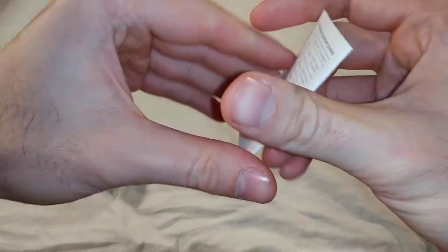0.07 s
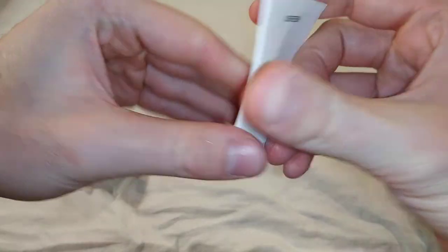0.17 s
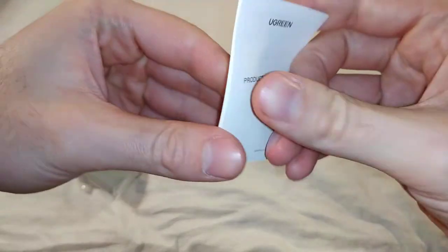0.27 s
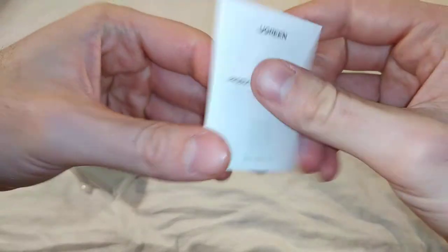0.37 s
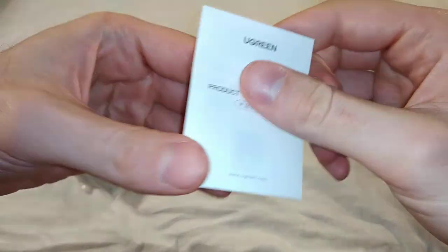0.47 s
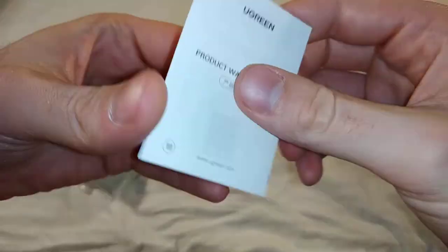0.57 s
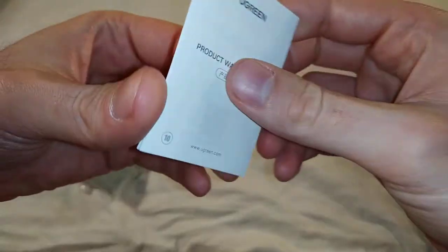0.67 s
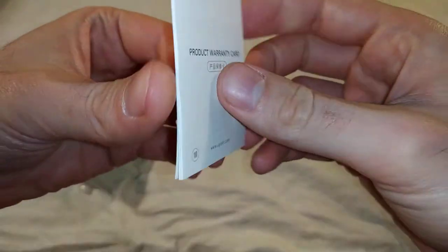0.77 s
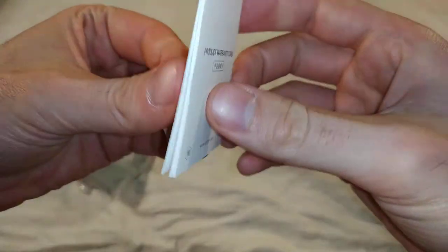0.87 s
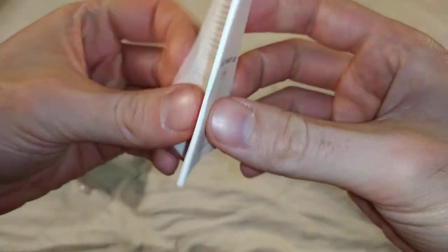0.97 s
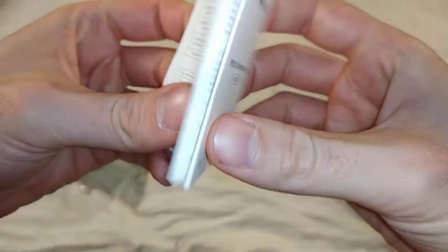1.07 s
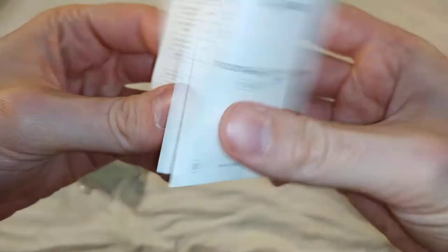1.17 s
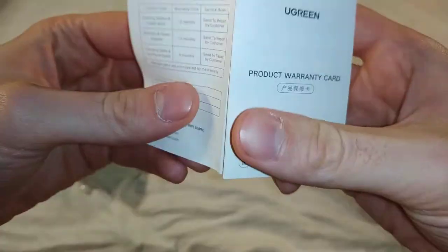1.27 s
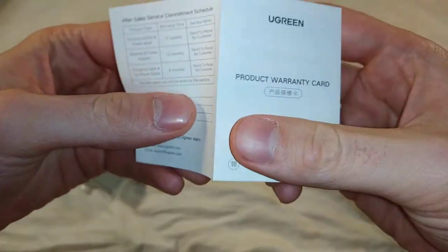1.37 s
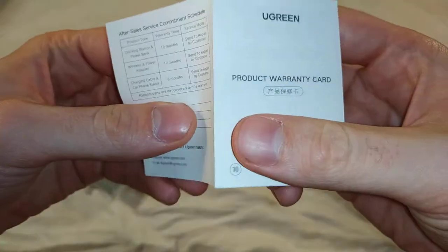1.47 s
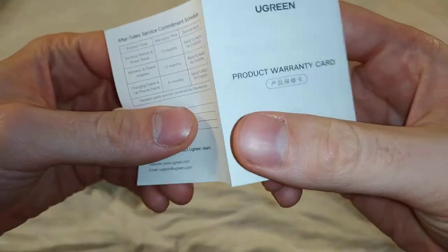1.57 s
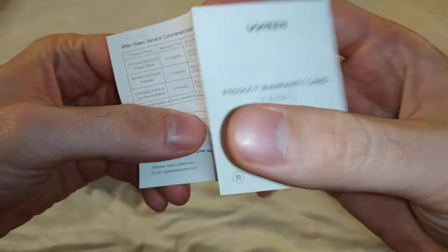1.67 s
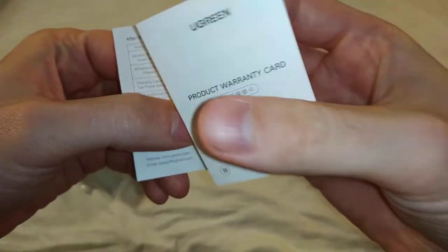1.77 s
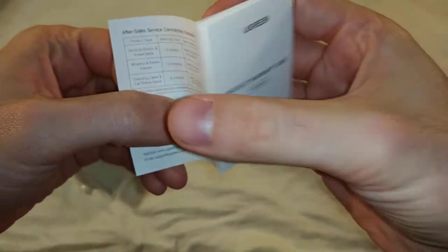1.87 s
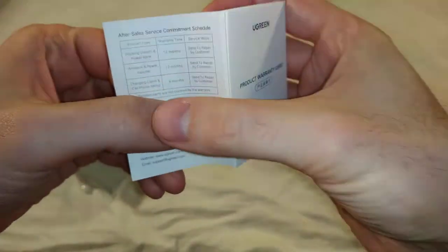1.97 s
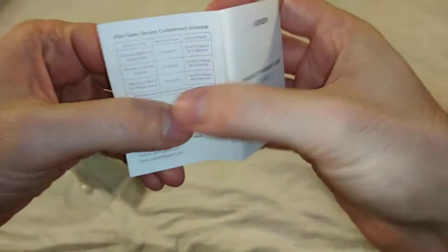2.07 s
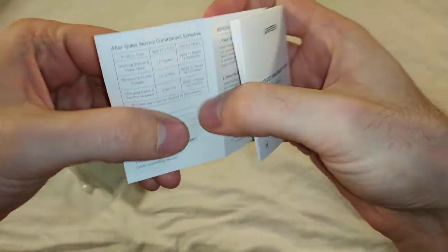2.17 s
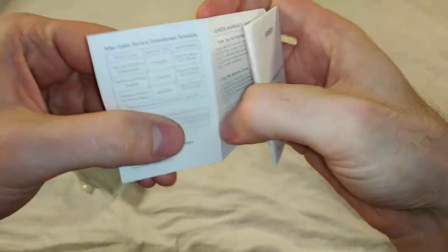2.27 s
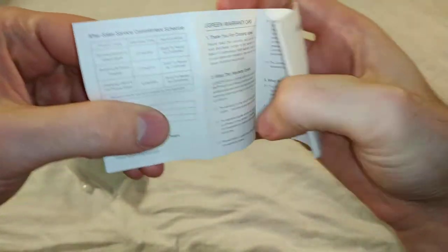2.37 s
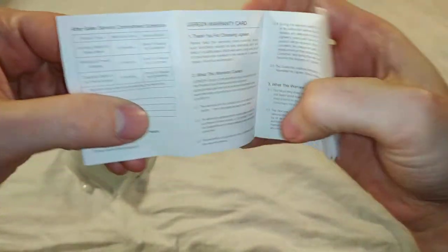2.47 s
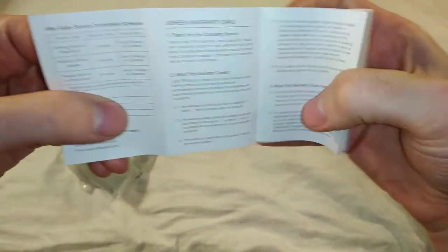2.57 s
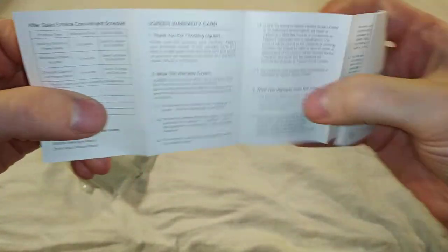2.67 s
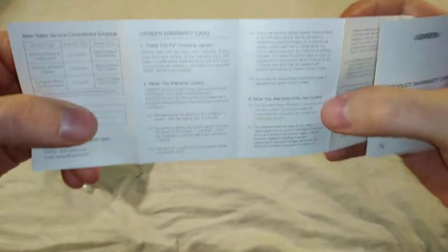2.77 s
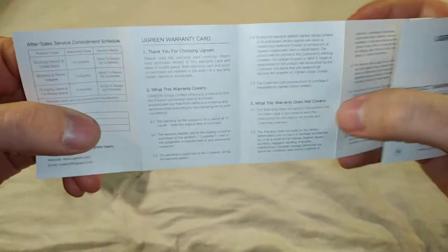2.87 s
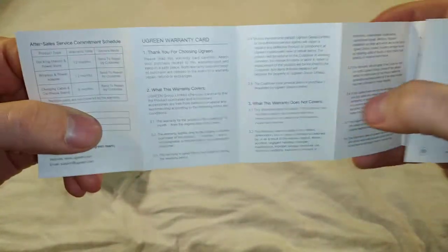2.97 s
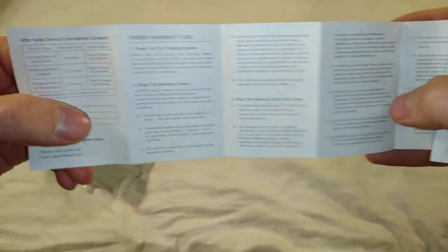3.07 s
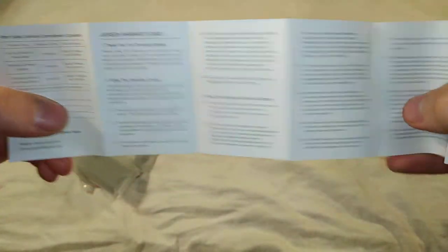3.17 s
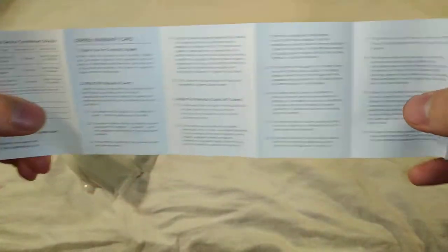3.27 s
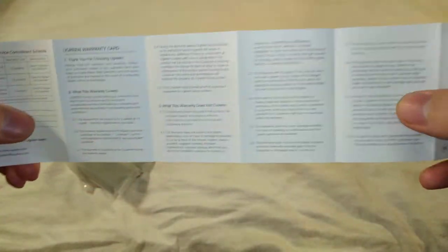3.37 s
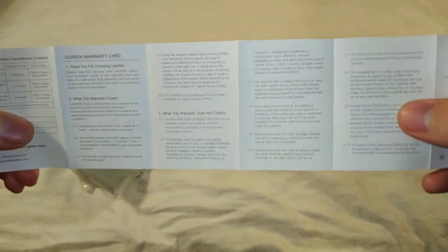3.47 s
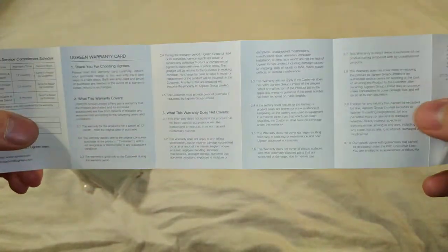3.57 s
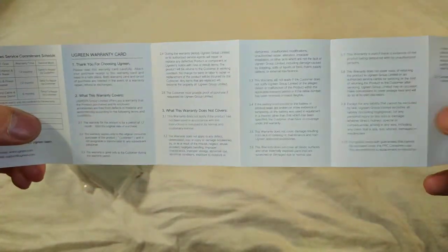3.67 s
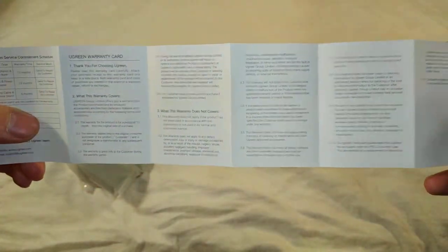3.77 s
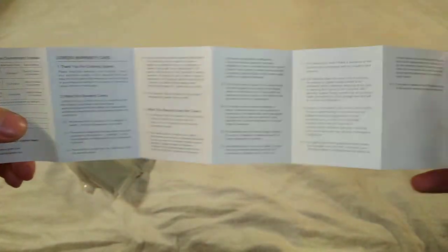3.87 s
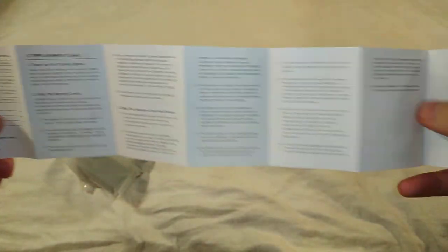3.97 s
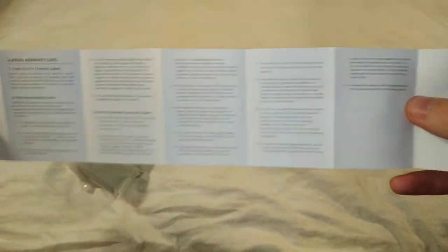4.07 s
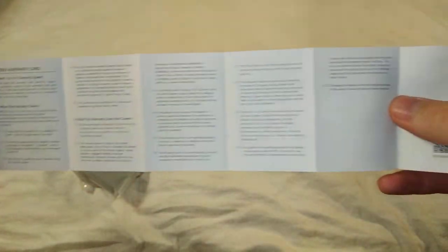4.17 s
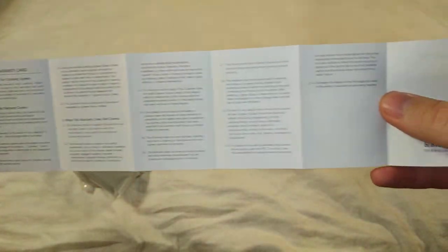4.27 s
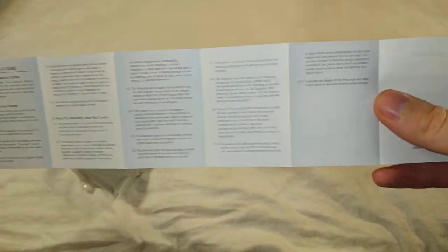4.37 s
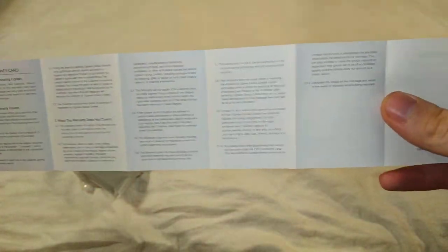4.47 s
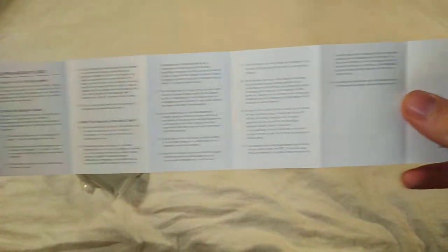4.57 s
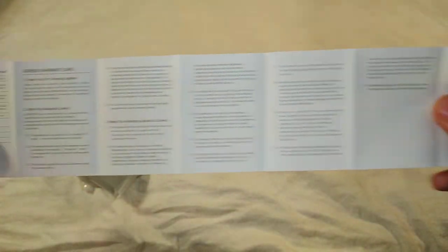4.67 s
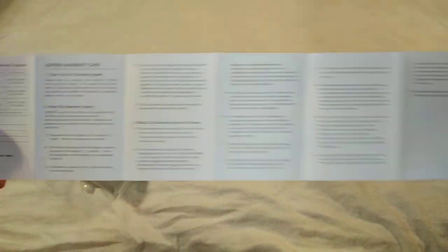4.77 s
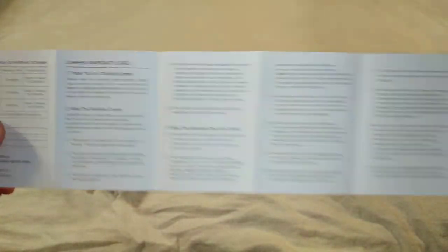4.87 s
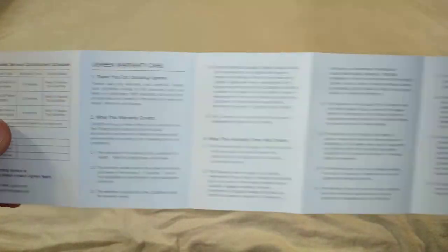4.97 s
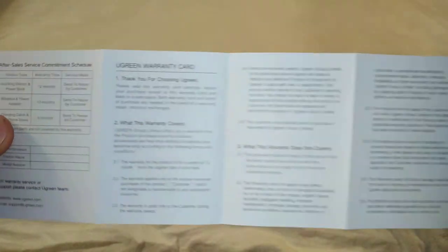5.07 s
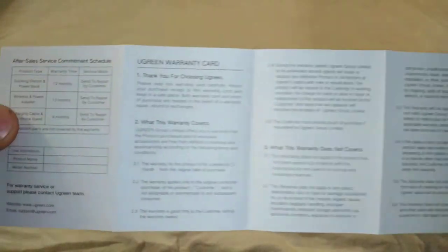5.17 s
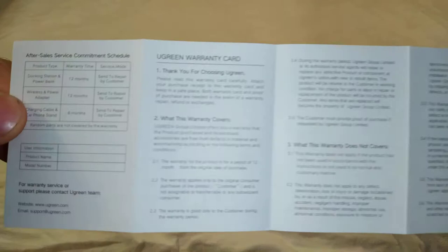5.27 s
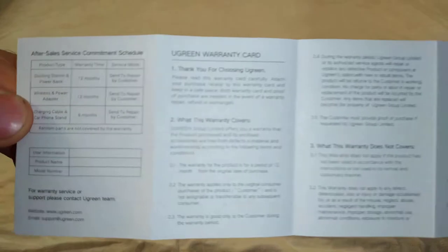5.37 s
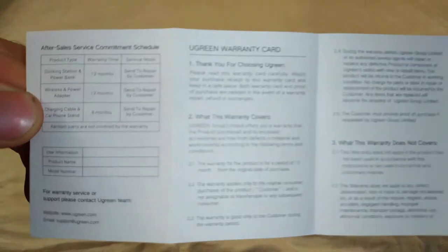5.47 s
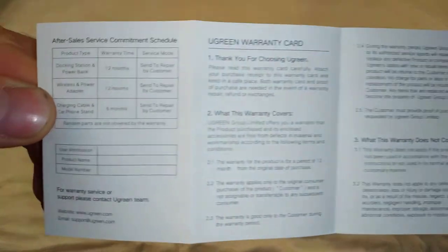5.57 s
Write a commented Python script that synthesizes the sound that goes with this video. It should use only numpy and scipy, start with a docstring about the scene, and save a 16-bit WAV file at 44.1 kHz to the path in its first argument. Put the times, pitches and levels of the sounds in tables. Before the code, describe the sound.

Close, dry paper handling: bright sliding hisses, brittle crackles and hollow little panel pops, busy at first, then fading into a faint humming room hush.

```python
"""Grainy hisses, short snaps and low pops: a folded paper leaflet is opened panel by panel in two hands.
Fingers and panels slide (random clicks and noise as hiss and scrape) and the loose sheet rumbles (low noise).
Creases snap (bursts of crackle in bands), panels pop (low sine tones), with short echoes from delay loops.
One long pull sings (clicks through a climbing resonance). The two-port microphone is close to the paper.
Behind it lie a faint room hush (noise) and a humming motor (sine tones)."""
import sys
import numpy as np
from scipy import signal
from scipy.fft import rfft, irfft, next_fast_len
from scipy.io import wavfile
from scipy.ndimage import uniform_filter1d, map_coordinates

SR = 44100
rng = np.random.default_rng(int(sys.argv[2]) if len(sys.argv) > 2 else 0)


def store_pcm(level_fs):
    """Save levels as 16-bit WAV."""
    pcm = np.round(np.clip(level_fs, -1, 1) * 32767).astype(np.int16)
    wavfile.write(sys.argv[1], SR, np.atleast_2d(pcm).T)


N = 247974  # length in samples

# Strokes of fingers and panels sliding on the paper. Each row: loudest moment in seconds, seconds to rise
# by STROKE_DEPTH_DB, seconds to fall by as much, hiss level in dB, scrape level against the hiss in dB,
# level of the treble above 10 kHz against the hiss in dB.
STROKE_ROWS = [(0.0, .1, 0.67, -47, -6.5, 5), (0.151, 0.06, 0.097, -31, -5, 0.5),
               (0.404, 0.13, 0.038, -28, -10.5, 1), (0.502, 0.01165, 0.24, -41, -8, 3),
               (0.736, 0.2, 0.035, -33, -9, -2), (0.802, 0.09, 0.044, -41, -7, 1),
               (0.964, .16, 0.13, -32.5, -11.5, 0), (1.174, 0.4, 0.32, -41, -11.5, 0),
               (1.366, 0.35, 0.088, -46.5, -3, -13), (1.461, 0.0085, 0.15, -34.5, -15, 4.5),
               (1.511, 0.069, 0.14, -35.5, -11, 0), (1.69, 0.094, 0.18, -30, -6, 1.5),
               (1.893, 0.21, 0.04, -34, -1.5, 4), (1.925, 0.06, 0.0323, -38.5, -6.5, 4),
               (1.995, 0.086, 0.46, -41.5, -5, 3.5), (2.127, .06, 0.25, -34, -6, -4),
               (2.312, 0.0146, 0.29, -31.5, -5, -15), (2.333, .05, 0.013, -33.5, -12, -10),
               (2.376, 0.21, 0.12, -35.5, 0, -3), (2.525, 0.11, 0.063, -32, -5.5, 0),
               (2.605, 0.15, 0.04, -30.5, -5, -2), (2.656, 0.014, 0.083, -27, -11, 5),
               (2.673, .04, .04, -27.5, -21, -4), (2.687, 0.019, 0.065, -33.5, -21, -2),
               (2.732, 0.08, 0.1, -30, -7, -1), (2.779, .1, 0.07, -34, -1.5, -20),
               (2.898, 0.038, 0.033, -36, 0, -5), (2.95, 0.22, 0.32, -39.5, -5, 3),
               (3.081, 0.54, 0.48, -37, -2, 4.5), (3.195, 0.091, 0.044, -34, -1, 10),
               (3.239, 0.23, 0.21, -28.5, -13, -7), (3.379, .2, 0.1, -37, -7.5, 2),
               (3.512, 0.019, 0.33, -45, -8, -10), (3.65, 0.17, 0.21, -33, -8.5, 1.5),
               (3.781, 0.026, 0.017, -27.5, -7, 4), (3.833, 0.053, 0.082, -39.5, 4.5, 6),
               (3.945, 0.12, 0.11, -34.5, -5.5, -11), (4.012, 0.28, 0.027, -37, -6, -4),
               (4.059, 0.0047, 0.097, -39.5, -3.5, 5), (4.123, 0.09, 0.02, -36.5, -9, -1),
               (4.208, 0.029, 0.35, -51, 5, 9.5), (4.373, 0.38, 0.038, -40, -3.5, -28),
               (4.565, 0.036, 0.091, -43.5, -6.5, -3), (4.61, 0.074, 0.027, -47.5, -3, -5),
               (4.856, 0.24, 0.102, -47.5, -5.5, 2.5), (5.1, 0.6, 0.39, -48.5, -6.5, -14),
               (5.301, 0.5, 0.14, -56.5, -2, -12)]
# A fingertip leaves the paper and the sliding drops. Each row: start in seconds, end in seconds, drop in dB.
FINGER_LIFTS = [(0.6067, 0.614, 17), (0.629, 0.631, 12.5)]
# Where the busy hand is. Each row: time in seconds, delay of the left port in ms, left against right in dB.
HAND_PATH = [(0.1, 0.2, 1.5), (0.35, 0.3, -5.5), (0.75, 0.11, 0), (1.0, 0.12, 1.5), (1.8, 0.084, -0.5),
             (2.1, 0.14, -2.5), (2.5, 0.098, -2), (2.9, 0.3, -4), (4.35, 0.3, -2.5), (4.48, -0.26, -2.5),
             (4.7, -0.06, -1.5), (4.9, -0.13, 2), (5.5, -0.057, -1.5)]
# How loose the sheet hangs, as its low rumble. Each row: time in seconds, rumble level in dB.
SHEET_SLACK = [(0, -62), (.4, -54.5), (.9, -57.5), (1.3, -53.5), (1.8, -54.5), (2.1, -51), (2.4, -49.5),
               (2.65, -52.5), (2.85, -55), (3.0, -49.5), (3.3, -54.5), (3.75, -55.5), (3.85, -52.5),
               (4.05, -57.5), (4.3, -61.5), (4.499, -53), (5.0, -57.5), (5.3, -57.5), (5.62, -55)]
# Tone colours of hiss, scrape, rumble and hush. Each row: frequency in Hz, relative strength in dB per Hz.
HISS_SPECTRUM = [(2350, -42), (4000, -12), (5040, -7), (7790, 3), (10400, 2), (12400, 1), (16000, 2.5)]
SCRAPE_SPECTRUM = [(710, -7.5), (1200, -4), (1350, -16.5), (1600, -3), (2140, -3), (3430, -1.5),
                   (5040, -0.5), (6000, 1), (7800, -10), (13200, -120)]
FLEX_SPECTRUM = [(47, -66), (80, -37.5), (208, 1), (301, 0.5), (371, -2), (529, -7.5), (701, -17.5),
                 (941, -8), (1500, -36), (1950, -88), (3300, -120)]
HUSH_SPECTRUM = [(24, -76), (40, -88), (96, -13.5), (237, -0.5), (467, 4), (529, -0.5), (615, -3),
                 (1300, -7.5), (5870, -24), (14500, -28), (16000, -17.5)]
# How alike the two sides of spread-out sound are. Each row: frequency in Hz, likeness (1 is identical).
SIDE_LIKENESS = [(100, 0.79), (400, 0.64), (1500, 0.022), (8000, 0.013)]
# The motor's tones. Each row: multiple of HUM_HZ, middle level in dB.
HUM_TONES = [(1, -79.5), (2, -68.5), (3, -68), (4, -70.5), (5, -74.5)]
# Creases buckling. Each row: start in seconds, level in the brightest octave in dB, that octave counted from
# 1 kHz, rise in ms, time to fade by 60 dB in ms (before the band's factor), left against right in dB.
CREASE_SNAPS = [(0.0700, -38, 1.46, 1.1, 16, -9), (0.1330, -33, 4, 3.3, 24, 15.5),
                (0.4120, -19.5, 2.5, 0.33, 13, -2.5), (0.4134, -26.5, 1.6, 0.57, 9.4, -12),
                (0.5005, -44, 3.5, 1.5, 22, -20), (0.6003, -32.5, 2.5, 1.7, 9.5, -4.5),
                (0.6135, -39.5, 3, 2.5, 17, 9), (0.6175, -28, 2.5, 2, 18, 2),
                (0.6205, -40, 5.5, 1.2, 15, -6), (0.6230, -36, 2.5, 1.2, 14, -10),
                (0.7310, -25.5, 4, 2.1, 34, 9.5), (0.742, -40, 2, 1.3, 9.5, -7),
                (0.996, -36, 1.5, 1.8, 24, -6), (1.0003, -25.5, 4, .8, 23, 13),
                (1.1510, -33, 4, 0.77, 12, -6), (1.181, -39, 3.5, 2.2, 39, 0), (1.1865, -34, 1, 0.8, 8, 0),
                (1.1897, -33, 2.5, 1.3, 28, 6), (1.1958, -26, 2, 0.65, 18, 3),
                (1.1985, -21.5, 2.5, 0.95, 19, -6), (1.2011, -18, 4.5, 0.27, 9, 10),
                (1.2042, -26, 4, 0.77, 6.6, -18), (1.2135, -32, 2.5, 0.87, 21, 8),
                (1.425, -33.5, 4.5, 5.5, 43, 5), (1.681, -52, 8, 2.5, 12, -2),
                (1.6920, -40, 1, 1.4, 15, -3), (1.701, -40, -0.8, 1.6, 11, -2),
                (1.713, -36, 1.5, 2.8, 13, -1), (1.742, -41, 1, 1.9, 15, 5),
                (1.7538, -29.5, 2, 0.91, 51, 0), (1.879, -46.5, -0.5, 2.3, 14, -2),
                (1.896, -48, 1, 1.4, 10, 1), (1.929, -39, 2.5, 1.5, 34, -4),
                (2.038, -41, 3.2, 3.6, 14, -17), (2.0645, -36, 2.5, 0.98, 34, -14),
                (2.1230, -35.5, 0.3, 0.92, 6.7, -8), (2.2458, -27.5, 1.47, 2.2, 17, -6),
                (2.3085, -26, 3.5, 1.6, 12, -3), (2.3228, -38, 10, 0.98, 4.4, -6),
                (2.3302, -32, 0.35, 0.54, 10.6, -6), (2.315, -35, 3, 2.3, 12, -5),
                (2.337, -44, -1.5, 0.52, 8.5, -5), (2.363, -44, 9, 0.56, 8.7, -3),
                (2.5352, -23.5, 0.95, 0.76, 17, 14), (2.5436, -19, 1.42, 0.8, 24.6, -13.5),
                (2.5460, -28, 1.5, 0.41, 25, 19), (2.598, -37, 1, 2.8, 19, -9),
                (2.609, -40, .8, 1.5, 13, -9), (2.6595, -29, 3.5, 0.52, 11, 1),
                (2.7190, -36, 1, 1.9, 23, -11), (2.739, -40, -5, 0.93, 6.7, 2),
                (2.7865, -30, 3, 1.6, 15, -9), (2.8930, -35.5, 0.55, 1.8, 44, -8.5),
                (2.938, -40, 0.5, 1.3, 7.9, -10), (3.2110, -21.5, 3.2, 1.1, 16, -13.5),
                (3.2145, -18.5, 3.5, 0.97, 12, 3), (3.2175, -18, 4.5, 0.72, 8.1, 9),
                (3.2292, -25, 1.47, 2, 14, -5), (3.243, -28, 3, 0.7, 10, -3),
                (3.3525, -31, 1.32, 1.28, 39, -9.5), (3.7696, -23.5, 2.5, 0.5, 35, -7.5),
                (3.7712, -23.5, 3.5, 0.49, 12, -4), (3.7835, -27.5, 2.3, 0.79, 18, 12),
                (3.8118, -25, 2.5, 3, 24, -12), (3.8168, -19.5, 2, 0.46, 13.5, 6.5),
                (3.8180, -19.5, 1.53, 0.49, 30, -5), (3.8287, -27.5, 4, 0.6, 24, -19),
                (3.877, -41, 0.2, 0.99, 7.7, -8), (3.903, -40.5, 0.9, 1.7, 10, -8),
                (3.921, -43, 2.5, 1, 12, -9), (3.9350, -30.5, 2, 0.53, 40, -5),
                (4.055, -45, 1, 1.2, 16, -3), (4.3098, -27, 3.5, 2, 8.1, -12),
                (4.3132, -19, 1.5, 1.15, 9.3, 1), (4.3158, -23.5, 1.5, 1.43, 12, 7.5),
                (4.3188, -21, 2, 0.34, 28, -8), (4.5012, -36, 1.5, 1.1, 10, 0),
                (4.5035, -30, 1.66, 0.16, 25, 6.5), (4.511, -39.5, 0.5, 1.4, 13, 3),
                (4.5570, -46.5, 2.5, 2.2, 11, -19), (4.6378, -36, 1, 0.4, 40, -9),
                (4.6415, -36, 1.3, 1.1, 20, -5), (4.7575, -46, 3, 1, 15, 7),
                (4.9778, -42.5, 0.2, 0.75, 26, 2), (5.397, -49.5, 2.5, 3.1, 42, 2.5),
                (5.4478, -44.5, 2.5, 1, 59, 0)]
# Bands of a snap. Each row: low edge in Hz, high edge in Hz, factor on the fade time.
CREASE_BANDS = [(375, 670, 3.4), (740, 1260, 0.96), (1510, 2770, 0.86), (3120, 5600, 0.43),
                (6150, 9600, 0.64), (10400, 19000, 0.6)]
# Panels popping into a new shape and ringing low. Each row: start in seconds, pitch in Hz, level of the
# lowest tone in dB, rise in ms, time to fade by 60 dB in ms.
PANEL_POPS = [(0.070, 400, -31.5, 2.1, 30), (1.001, 440, -33.5, 1.6, 16), (1.199, 373, -28, 1.55, 35),
              (1.692, 474, -35, 1.8, 34), (1.708, 320, -40, 1.7, 28), (1.876, 387, -47, 2.9, 42),
              (2.038, 453, -34, 1.4, 28), (2.065, 500, -33.5, 3.4, 29), (2.122, 374, -38, 3.7, 37),
              (2.246, 484, -28, 2.5, 41), (2.308, 305, -37, 4.8, 49), (2.322, 300, -31.5, 2.6, 48),
              (2.362, 620, -35.5, 1.9, 64), (2.380, 377, -37.5, 2.9, 71), (2.408, 216, -49, 8.3, 60),
              (2.545, 330, -27, 3, 55), (2.612, 170, -36.5, 10, 46), (2.678, 290, -37, 3.2, 71),
              (2.737, 292, -31, 5.1, 31), (2.765, 206, -43, 6.4, 62), (2.788, 370, -49, 4, 40),
              (2.812, 240, -35.5, 3.9, 87), (2.855, 225, -44, 11, 95), (2.893, 288, -37, 1.7, 46),
              (2.937, 288, -28.5, 2, 29), (2.972, 420, -34.5, 3, 70), (3.056, 308, -34.5, 5.3, 67),
              (3.075, 280, -43, 5.9, 91), (3.210, 258, -36, 2.6, 33), (3.240, 364, -38, 3.6, 50),
              (3.354, 256, -28, 3.1, 82), (3.39, 262, -40.5, 4.8, 87), (3.770, 535, -31.5, 2.3, 39),
              (3.783, 246, -26, 1.7, 36), (3.829, 314, -27.5, 1.2, 24), (3.879, 230, -37.5, 3.9, 50),
              (4.006, 480, -42.5, 2.4, 29), (4.311, 225, -33, 2.9, 66), (4.503, 380, -47, 1.5, 20),
              (4.638, 297, -25, 2.2, 17), (4.978, 330, -36, 1.3, 22)]
# The long singing pull, one row: loudest moment in seconds, rise in seconds, fall in seconds, level in dB,
# resonance centre at the loudest moment in Hz, climb in Hz per second, width in Hz.
LONG_PULL = (3.14, .36, .16, -40, 3300, 1500, 1500)

STROKE_DEPTH_DB = 20  # drop after one rise or fall time
REST_DB, REST_SCRAPE_DB = -60, -6  # resting touch: hiss level, and scrape against it
TREBLE_LEFT_DB = 3.5  # the left port faces the paper and catches more treble
FLEX_FOLLOWS = 0.2  # share of the scrape's swing in dB that shakes the sheet
FLEX_LUMPS_DB = 2.6  # unevenness of the rumble
HUSH_DB, HUM_HZ = -59, 119.8
SNAP_CURVE_DB = 6  # loss per octave squared away from the brightest octave
BREAK_MS = 2.4  # rise time at which the first break is as strong as one click of the crackle
SMALL_SNAP_DB, SMALL_SNAP_T60_MS = -5.5, 5  # middle level against the hiss; fade before the band's factor
FLAP_WIDTH = 1.8  # left-right spread of pops against the hand's
ROOM_T60_S, ROOM_DB, WALL_CUT_HZ = 0.13, -11.5, 3800  # fading time in the bass, echo level, treble loss


def from_db(db):
    """Turns decibels into gain."""
    return 10 ** (np.asarray(db) / 20)


def rms_one(x):
    """Scales a sound to an average (rms) strength of 1."""
    return x / np.sqrt(np.mean(x ** 2) + 1e-20)


def in_time(rows):
    """Draws each column of a timed table as a curve with one value per sample."""
    s, *columns = np.transpose(rows)
    return [np.interp(np.arange(N) / SR, s, column) for column in columns]


def at_hz(points, hz):
    """Reads a spectrum between its points, on a log-frequency axis."""
    point_hz, values = np.transpose(points)
    return np.interp(np.log(hz), np.log(point_hz), values)


def cut_below(x, hz, order=2):
    """Takes away what lies below a frequency."""
    return signal.sosfilt(signal.butter(order, hz, "high", fs=SR, output="sos"), x)


def drift(rate_hz):
    """Slow random wander of spread 1: noise smoothed twice, one value every 20 samples, then joined up."""
    r = np.exp(-40 * np.pi * rate_hz / SR)
    noise = rng.standard_normal(N // 20 + 2002)
    slow = signal.lfilter([1], [1, -2 * r, r * r], noise)[2000:]  # skip the filter's start
    return np.interp(np.arange(N) / 20, np.arange(len(slow)), rms_one(slow))


def colour(x, spectrum):
    """Gives a white signal the spectrum, at rms 1."""
    size = next_fast_len(N)
    hz = np.maximum(np.arange(size // 2 + 1) * SR / size, 1)
    gain = from_db(at_hz(spectrum, hz))
    return rms_one(irfft(rfft(x, size) * gain, size)[..., :N])


def diffuse(spectrum):
    """Stereo noise at rms 1 whose two sides grow unlike toward the treble."""
    likeness_hz, alike = np.transpose(SIDE_LIKENESS)
    size = next_fast_len(N)
    hz = np.maximum(np.arange(size // 2 + 1) * SR / size, 1)
    mid, side = rng.standard_normal((2, size))
    side_power = at_hz(np.c_[likeness_hz, (1 - alike) / (1 + alike)], hz)
    side = irfft(rfft(side) * np.sqrt(side_power), size)
    return colour(np.array([mid + side, mid - side])[:, :N], spectrum)


def grains(per_s, spread_db):
    """Fibres catching and letting go: random clicks of uneven size and sign."""
    sizes = from_db(spread_db * np.minimum(rng.exponential(1, N), 5))
    signs = rng.choice([-1, 1], N)
    return sizes * signs * (rng.random(N) < per_s / SR)


def to_ports(x, pan_db):
    """A close source: louder on one side, and later at the far port."""
    lag_ms, _ = in_time(HAND_PATH)
    left = map_coordinates(x, [np.arange(N) - lag_ms * SR / 1000], order=3)
    return np.array([left * from_db(pan_db / 2), x * from_db(-pan_db / 2)])


def strokes():
    """Strokes swell and fade evenly in dB over a resting touch; gives hiss, scrape and treble levels in dB."""
    t = np.arange(0, N + 20, 20) / SR
    rest_db = REST_DB + np.array([0, REST_SCRAPE_DB, 0])
    power = np.outer(from_db(2 * rest_db), np.ones(len(t)))
    for s, rise_s, fall_s, hiss_db, scrape_db, treble_db in STROKE_ROWS:
        away = np.maximum((s - t) / rise_s, (t - s) / fall_s)
        level_db = hiss_db - STROKE_DEPTH_DB * np.minimum(away, 8)
        power = power + from_db(2 * (level_db + np.c_[[0, scrape_db, treble_db]]))
    for start, end, drop_db in FINGER_LIFTS:
        lifted = np.clip(np.minimum(t - start, end - t) / 0.0009, 0, 1)  # eased over 0.9 ms
        power = power * from_db(-2 * drop_db * lifted)
    return in_time(np.c_[t, 10 * np.log10(power).T])


def slide(spectrum, pan_db, near_share):
    """Stick-slip grains at the fingers, plus the part given off by the whole sheet."""
    near = to_ports(colour(grains(12000, 2.35), spectrum), pan_db)
    wide = diffuse(spectrum) * from_db(np.outer([.5, -.5], pan_db))
    both = np.sqrt(near_share) * near + np.sqrt(1 - near_share) * wide
    return cut_below(both, 450)  # the rubbing keeps nothing below 450 Hz


def patchy(x, low_hz, high_hz, patchy_db, rate_hz):
    """Quarter-octave bands of the rubbing drift up and down in level independently, at random."""
    edges = np.geomspace(low_hz, high_hz, num=round(4 * np.log2(high_hz / low_hz)) + 1)
    changed = x.copy()
    for edge in zip(edges, edges[1:]):
        band = signal.sosfilt(signal.butter(2, edge, "band", fs=SR, output="sos"), x)
        changed += (from_db(patchy_db * drift(rate_hz)) - 1) * band
    return rms_one(changed)


def rub(hiss_db, scrape_db, treble_db):
    """Sliding: one clumpy stick-slip drives a bright hiss and a lower scrape; the panels flex in lumps."""
    _, pan_db = in_time(HAND_PATH)
    clumps_db = .8 * drift(30) + 1.1 * drift(130)

    hiss = patchy(slide(HISS_SPECTRUM, pan_db, 0.13), 4720, 15500, patchy_db=3.5, rate_hz=8.3)
    sheen_db = treble_db - hiss_db + np.c_[[TREBLE_LEFT_DB / 2, -TREBLE_LEFT_DB / 2]]
    hiss = hiss + (from_db(sheen_db) - 1) * cut_below(hiss, 10000)

    scrape = patchy(slide(SCRAPE_SPECTRUM, pan_db, 0.43), 930, 5080, patchy_db=4.0, rate_hz=20)
    # a faint, steady sprinkle of fine ticks, some 280 a second, runs under the scrape
    ticks = to_ports(colour(grains(280, 0.99), SCRAPE_SPECTRUM), pan_db)
    scrape = scrape + from_db(-26.5) * cut_below(ticks, 500)

    flex_db = in_time(SHEET_SLACK)[0] + FLEX_FOLLOWS * (scrape_db - scrape_db.mean())
    flex_gain = from_db(flex_db + FLEX_LUMPS_DB * drift(31))
    flex = flex_gain * diffuse(FLEX_SPECTRUM) * from_db(np.outer([.4, -.4], pan_db))
    return from_db(hiss_db + clumps_db) * hiss + from_db(scrape_db + clumps_db) * scrape + flex


def hush():
    """The quiet room: faint, steady stereo noise."""
    return from_db(HUSH_DB) * diffuse(HUSH_SPECTRUM)


def hum():
    """A distant motor: low multiples of one tone, each wavering in level, all wavering in pitch together."""
    turns = 2 * np.pi * np.cumsum(HUM_HZ * (1 + 0.00407 * drift(2.52))) / SR
    total = np.zeros(N)
    for multiple, db in HUM_TONES:
        gain = np.sqrt(2) * from_db(db + 3.2 * drift(2.5))
        total += gain * np.sin(multiple * turns + rng.uniform(0, 2 * np.pi))
    return total


def snaps(rows):
    """A crease gives way with one break and a burst of crackle; the lows ring on longer in the panel."""
    out, age = np.zeros((2, N)), np.arange(int(.12 * SR)) / SR
    crackle = grains(15000, 5.0)
    # even out the strength from moment to moment
    crackle = crackle / np.sqrt(uniform_filter1d(crackle ** 2, size=48) + 0.029 * np.var(crackle))
    at_ports, lag_ms = to_ports(crackle, 0), in_time(HAND_PATH)[0]
    for k, (low_hz, high_hz, longer) in enumerate(CREASE_BANDS):
        octave = np.log2(low_hz * high_hz / 1000 ** 2) / 2  # band centre, counted from 1 kHz
        shape, breaks = np.zeros((2, 2, N + len(age)))
        for s, peak_db, brightest, rise_ms, t60_ms, pan_db in rows:
            rise_s = max(rise_ms, .2) / 1000
            fade = from_db(-60 * np.maximum(age - rise_s, 0) / (t60_ms * longer / 1000))
            burst = fade * np.minimum(age / rise_s, 1) ** 1.36
            band_db = peak_db - SNAP_CURVE_DB * (octave - brightest) ** 2
            sides = from_db(band_db + np.array([pan_db, -pan_db]) / 2)
            shape[:, round(s * SR):][:, :len(age)] += np.outer(sides, burst)
            # the more sudden the crease, the stronger its first break
            port_lag_s = np.array([lag_ms[int(s * SR)], 0]) / 1000
            at = np.round((s + rise_s + port_lag_s) * SR).astype(int)
            breaks[[0, 1], at] += sides * BREAK_MS / 1000 / rise_s
        band = signal.butter(2, [low_hz, high_hz], "band", fs=SR, output="sos")
        # even out the bands by what each lets through, with an extra lift for the lows
        passed = np.std(signal.sosfilt(band, crackle)) / np.sqrt(1 + 500 / low_hz)
        driven = (shape[:, :N] * at_ports + breaks[:, :N]) / passed
        out += (-1) ** k * signal.sosfilt(band, driven + 1e-18)
    return out


def small_snaps(hiss_db):
    """Rows for 70 small creases at random, mostly along busy strokes, louder where the sliding is louder."""
    busy = np.cumsum(from_db(hiss_db))
    when, size, colour_draw, side = rng.random((70, 4)).T
    at = np.minimum(np.searchsorted(busy, when * busy[-1]), N - 1)
    peak_db = hiss_db[at] + SMALL_SNAP_DB + 8 * (size - .5)
    brightest = 0.96 + 3.1 * colour_draw
    rise_ms, t60_ms = np.full(len(at), .8), np.full(len(at), SMALL_SNAP_T60_MS)
    pan_db = in_time(HAND_PATH)[1][at] + 14 * (side - .5)
    return list(zip(at / SR, peak_db, brightest, rise_ms, t60_ms, pan_db))


def flaps(rows):
    """A panel pushed through its bend rings on its lowest mode with two shorter upper ones."""
    age = np.arange(int(.25 * SR)) / SR
    out = np.zeros((2, N + len(age)))
    luck, hand_db = rng.random((len(rows), 4)), in_time(HAND_PATH)[1]
    for (s, hz, peak_db, rise_ms, t60_ms), (stretch, phase, far, far_phase) in zip(rows, luck):
        pan_db, rise_s = FLAP_WIDTH * hand_db[int(s * SR)], rise_ms / 1000
        turns = 2 * np.pi * hz * age
        dying = from_db(-60 * np.maximum(age - rise_s, 0) / (t60_ms / 1000))
        second = 0.5 * np.sin((1.394 + 0.82 * stretch) * turns + 2 * np.pi * phase)
        third = 0.23 * np.sin((2.32 + 1.02 * far) * turns + 2 * np.pi * far_phase)
        tone = np.sin(turns) + second * dying + third * dying ** 2
        swell = np.sin(np.pi / 2 * np.minimum(age / rise_s, 1)) ** 2
        sides = from_db(peak_db + np.array([pan_db, -pan_db]) / 2)
        out[:, round(s * SR):][:, :len(age)] += np.outer(sides, tone * dying * swell)
    return cut_below(out[:, :N] + 1e-18, 130)  # a small panel radiates little deep bass


def room(x):
    """Echoes: six feedback delays a side, duller on every round, stepped block by block."""
    out, dull = np.zeros((2, N)), np.exp(-2 * np.pi * WALL_CUT_HZ / SR)
    for k, lag in enumerate((rng.uniform(0.0026, .02, 12) * SR).astype(int)):
        loop, gain, state = x.copy(), from_db(-60 * lag / SR / ROOM_T60_S), [0.]
        for i in range(lag, N, lag):
            back, state = signal.lfilter([gain * (1 - dull)], [1, -dull], loop[i - lag:i], zi=state)
            loop[i:i + lag] += back[:N - i]
        out[k % 2] += (loop - x) * (-1) ** (k // 2)
    return out


def pull():
    """A taut panel dragged through the fingers: grains through one broad resonance that climbs in pitch."""
    s, rise_s, fall_s, level_db, hz, climb, width_hz = LONG_PULL
    t, r, state = np.arange(N) / SR, np.exp(-np.pi * width_hz / SR), np.zeros(2)
    slips, sung = grains(12000, 3.9), np.zeros(N)
    for i in range(0, N, 256):
        now_hz = np.clip(hz + climb * (t[i] - s), 1000, 6000)
        ringing = [1, -2 * r * np.cos(2 * np.pi * now_hz / SR), r * r]
        sung[i:i + 256], state = signal.lfilter([1, 0, -1], ringing, slips[i:i + 256], zi=state)
    away = np.maximum((s - t) / rise_s, (t - s) / fall_s)
    gain = from_db(level_db - STROKE_DEPTH_DB * away ** 2)
    return gain * to_ports(rms_one(sung), in_time(HAND_PATH)[1])


def scene():
    """Paper close by, echoes of its snaps and pops, and the hush and hum behind."""
    hiss_db, scrape_db, treble_db = strokes()
    sliding = rub(hiss_db, scrape_db, treble_db)
    background = hush() + hum()
    blows = snaps(CREASE_SNAPS + small_snaps(hiss_db)) + flaps(PANEL_POPS)
    echoes = from_db(ROOM_DB) * room(blows.mean(axis=0))
    return sliding + background + blows + echoes + pull()


def record(dry):
    """The microphone drops the deep bass; the top is cut steeply above 15.7 kHz."""
    dry = cut_below(dry, 60, order=1)
    return signal.sosfilt(signal.ellip(12, .5, 75, 15700, fs=SR, output="sos"), dry)


dry = scene()
out = record(dry)
store_pcm(out)
```